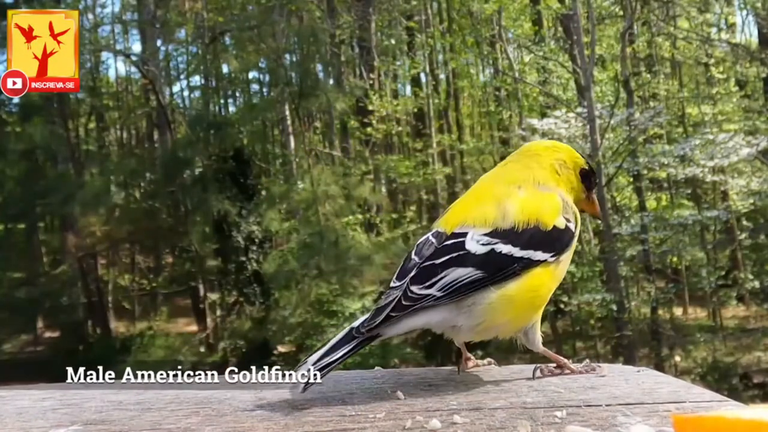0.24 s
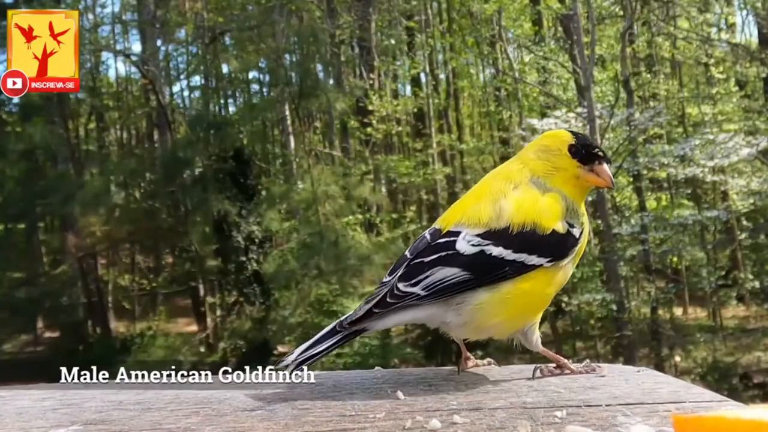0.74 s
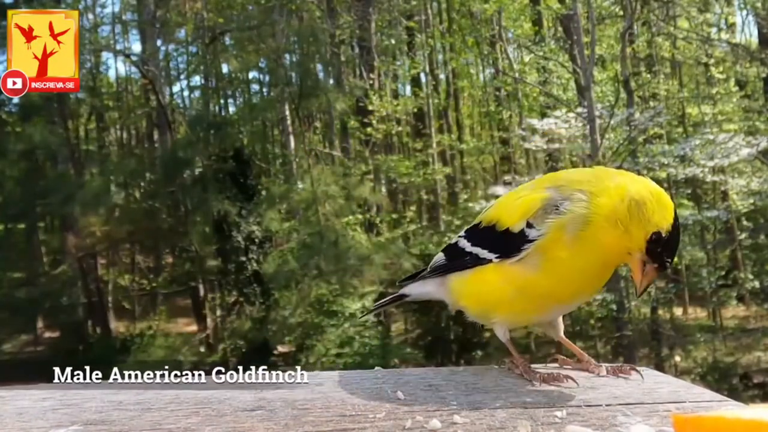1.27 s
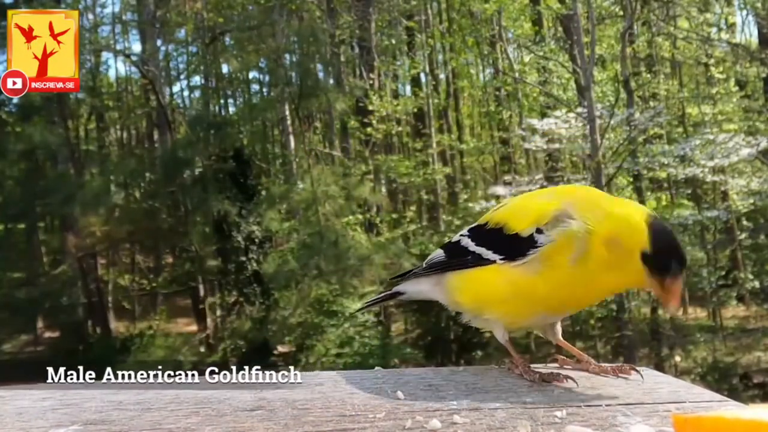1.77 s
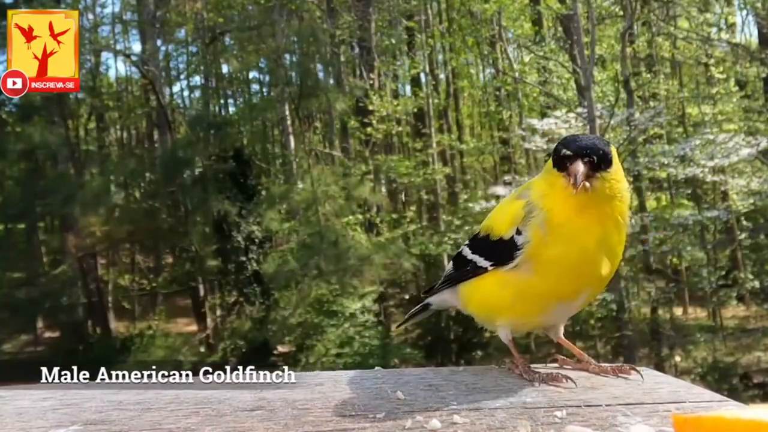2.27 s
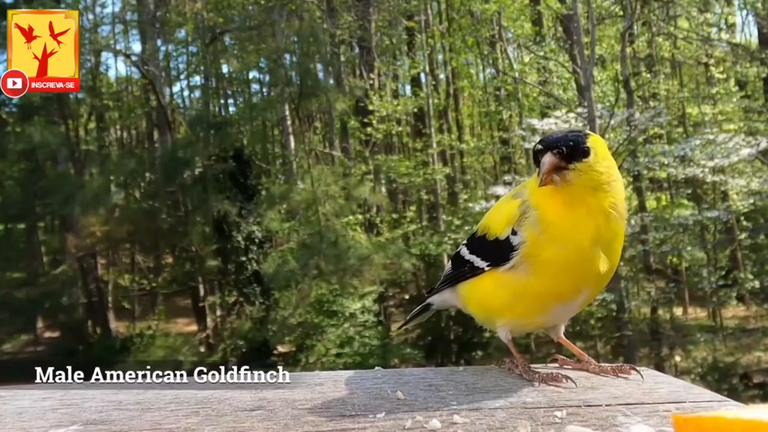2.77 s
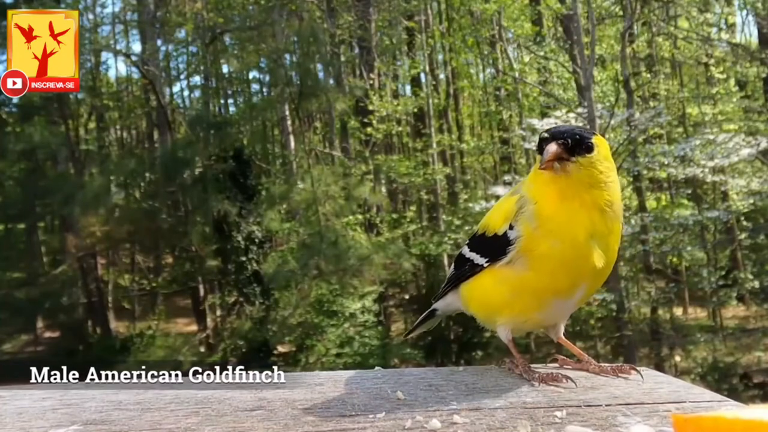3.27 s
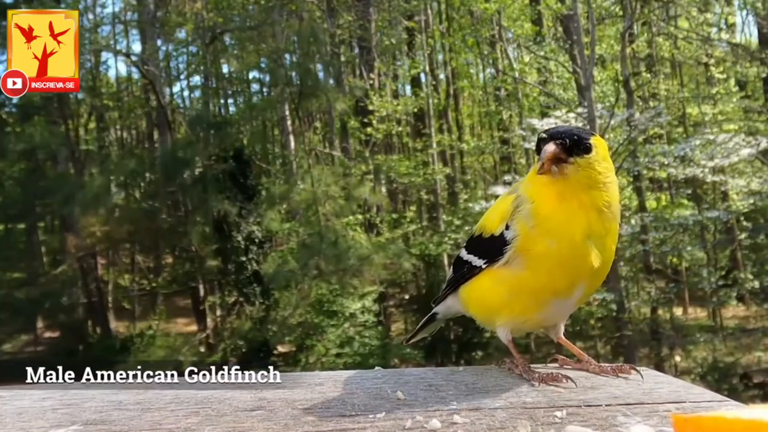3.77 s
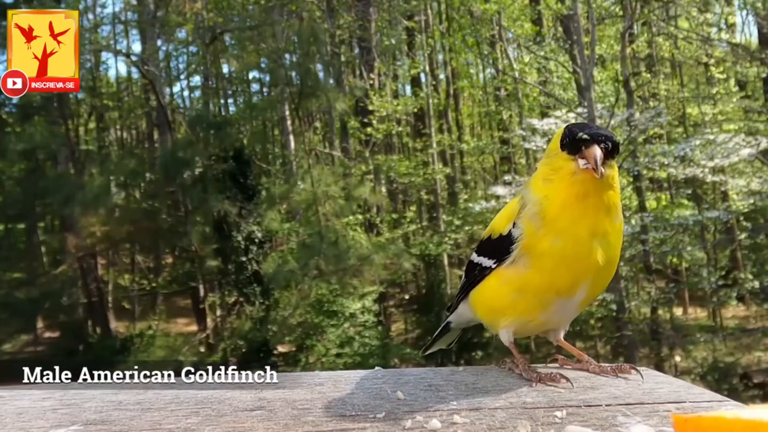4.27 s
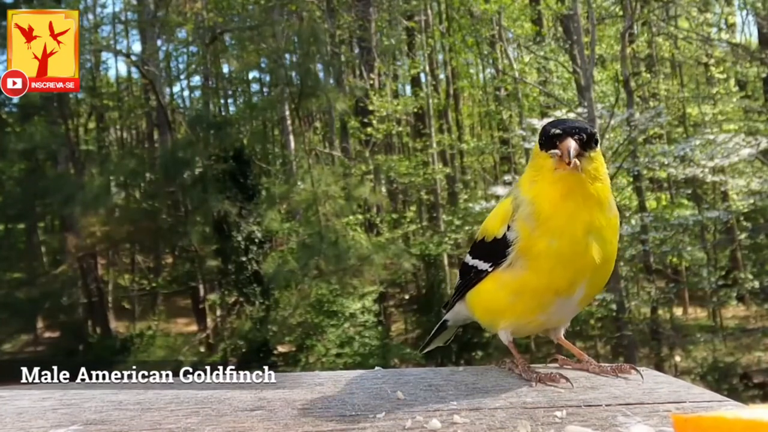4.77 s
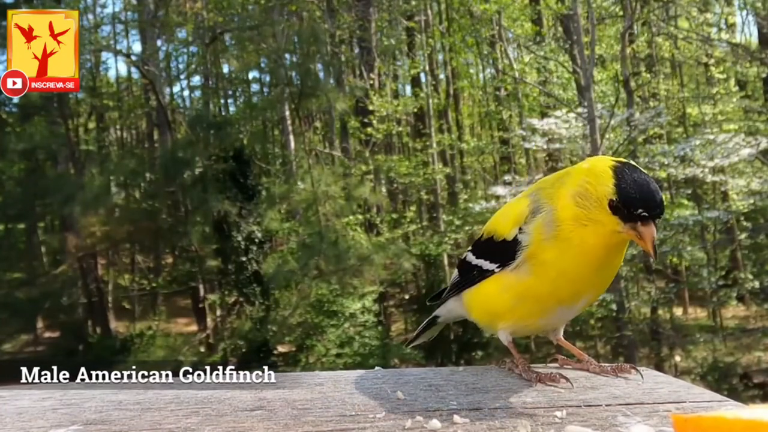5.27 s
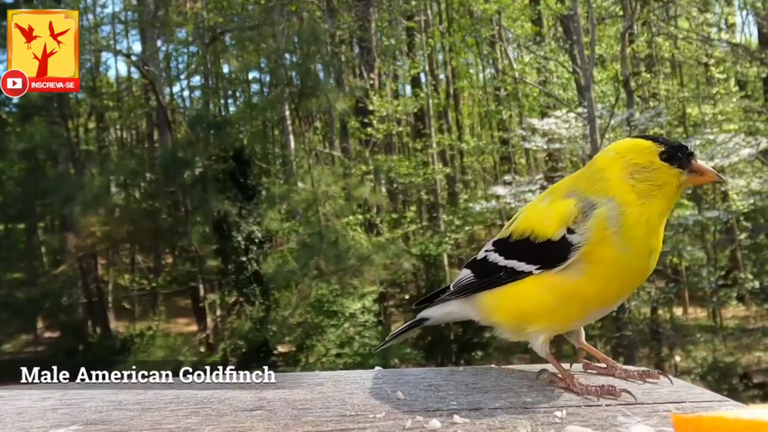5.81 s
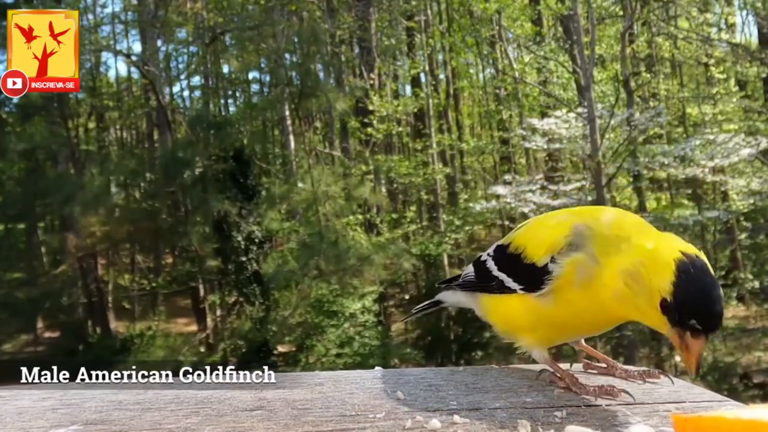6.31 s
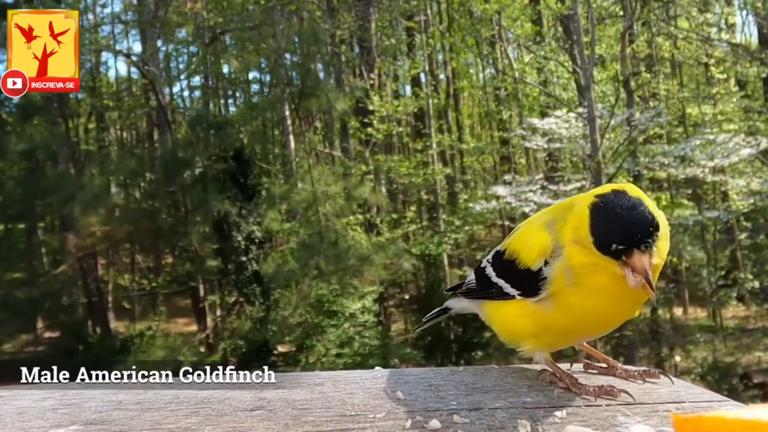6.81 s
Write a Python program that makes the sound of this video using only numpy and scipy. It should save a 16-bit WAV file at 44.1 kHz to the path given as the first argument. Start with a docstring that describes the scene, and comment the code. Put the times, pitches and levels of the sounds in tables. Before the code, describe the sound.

Backyard feeder in the woods: dry wooden ticks, thin bird whistles, a buzzing trill and brief wing thumps above far traffic rumble.

```python
"""Beaks and claws tick and knock on a wooden feeder throughout: noise bursts excite decaying board modes.
Small birds pip, whistle and warble as gliding tones that echo among trees; far traffic hisses as shaped noise.
A far engine's firing tone swells and fades, a car passes near 1 s, and the image opens from mono to stereo.
Buzzes and chips follow; near 3.7 s a buzz opens a trill, rapid frequency modulation of one whistle.
Wing beats puff air on the microphones near 4 s, a squeak falls, and ticks, whistles and buzzes go on."""
import sys
import numpy as np
from scipy import signal
from scipy.fft import rfft, irfft, next_fast_len
from scipy.io import wavfile
from scipy.ndimage import uniform_filter1d, map_coordinates

SR = 44100
rng = np.random.default_rng(int(sys.argv[2]) if len(sys.argv) > 2 else 0)


def volts_from_decibels(level):
    """Turn decibel levels (scalar or array-like) into linear amplitude factors."""
    exponent = np.asarray(level, float) / 20
    return 10 ** exponent


def to_wav(sig):
    """Store sig (one row per channel, or 1-D mono) as 16-bit WAV at the path in sys.argv[1].

    Samples outside -1..1 are clipped; the rate is SR.
    """
    pcm = np.clip(np.atleast_2d(sig), -1, 1) * 32767
    pcm = np.round(pcm).astype(np.int16)
    wavfile.write(sys.argv[1], SR, pcm.T)  # frames by channels


N = 310905
TIME = np.arange(N) / SR
SHAKE_RATE = 196  # shakes a second in the opening buzz and the trill


def unit(x):
    """Normalization: scales a signal to rms 1."""
    return x / np.sqrt(np.mean(x ** 2) + 1e-20)


def along(points, hz):
    """Interpolates (frequency [Hz], value) points on a logarithmic frequency axis."""
    f, v = np.transpose(points)
    return np.interp(np.log(hz + 1), np.log(f + 1), v)


def curves(rows, t=TIME):
    """Piecewise-linear control: one value per sample for each column after the first."""
    s, *columns = np.transpose(rows)
    return [np.interp(t, s, column) for column in columns]


def span(rows):
    """Windowing: first sample, times and a tapered envelope of a note."""
    first = round(rows[0][0] * SR)
    t = TIME[first:round(rows[-1][0] * SR)]
    return first, t, signal.windows.tukey(len(t), min(1, 400 / len(t)))


def wobble(rate, size=N):
    """Band-limited random modulation: a smooth curve through rate random knots a second."""
    knots = rng.standard_normal(int(size * rate / SR) + 4)
    return map_coordinates(knots, [np.arange(size) * rate / SR])


def filtered(x, response):
    """Linear filtering: the spectrum is multiplied by a response of frequency."""
    m = next_fast_len(x.shape[-1] + 8192)
    return irfft(rfft(x, m) * response(np.fft.rfftfreq(m, 1 / SR)), m)[..., :x.shape[-1]]


def add(out, first, x, pan_db):
    """Superposition: mixes a sound in, placed by a level difference of left over right."""
    x = x[:N - first]
    out[:, first:first + len(x)] += x * volts_from_decibels([[.5], [-.5]] * np.broadcast_to(pan_db, x.shape))


def sine(hz):
    """Phase is the integral of frequency: a tone of rms 1 that follows a pitch curve."""
    return np.sqrt(2) * np.sin(2 * np.pi * np.cumsum(hz) / SR)


def swell(length, edge_s):
    """Amplitude envelope: progress 0-1 of a note and its linear rise, hold and fall."""
    u = np.linspace(0, 1, round(length * SR))
    return u, np.clip(np.minimum(u, 1 - u) * length / edge_s, 0, 1)


def slur(length, start_hz, end_hz, bend, octave_db, late=1, hook_hz=0):
    """Frequency sweep with a second harmonic: a quick slide that grows louder and stops."""
    u = np.linspace(0, 1, round(length * SR))
    hz = end_hz + (start_hz - end_hz) * (1 - u) ** bend + hook_hz * u ** 4
    octave = volts_from_decibels(octave_db) / (u + .15) * sine(2 * hz)  # strongest against the tone at the soft start
    return u ** late * np.clip((1 - u) / 0.22, 0, 1) * (sine(hz) + octave)


def shaken(hz, swing_hz, rate, rough, pulse_db=0):
    """Frequency modulation: a whistle shaken fast; positive pulse_db makes its low pitches louder."""
    size = len(hz)
    phase = 2 * np.pi * np.cumsum(rate * (1 + .1 * rough * wobble(50, size=size))) / SR
    shake = np.sin(phase) + rough * wobble(300, size=size)
    level_db = 7.7 * rough * wobble(400, size=size) - pulse_db * shake
    return volts_from_decibels(level_db) * sine(hz + swing_hz * shake)


def birds():
    """Direct sound plus reflections: all the calls among echoing trees."""
    near, echo = np.zeros((2, 2, N))
    for call in (trill, opening_buzz, buzzes, chips, short_slurs, squeak, warbles, whistles, far_calls, pips):
        call(near, echo)
    wall = .3 * np.roll(echo, round(.025 * SR), axis=1)  # one reflection
    return near + wall + woods(echo, delay_s=.012)


def trill(near, echo):
    """Periodic frequency modulation: one pitch pattern repeats at a slowing rate and dies away."""
    start_s, end_s = 3.8565, 4.285
    rate, slows = 40.8, 18  # syllables a second, and their loss a second
    # pitch pattern of one syllable: (share of its length [0-1], frequency [Hz], relative level [dB])
    syllable = [(0, 3581, -5.5), (.1, 3423, 5.5), (.21, 3225, -4.5), (.33, 3504, -15.5), (.45, 3812, 3),
                (.6, 4060, 5.5), (.78, 4400, -5), (.9, 4082, -4)]
    u, edge = swell(end_s - start_s, 0.0089)
    t = u * (end_s - start_s)
    closed = [*syllable, (1, *syllable[0][1:])]  # each ends where the next begins
    hz, accent_db = curves(closed, np.cumsum(rate - slows * t) / SR % 1)
    shake = np.sin(2 * np.pi * SHAKE_RATE * t)  # the buzz lingers in every syllable
    hz = hz + 60 * shake
    accent_db = accent_db + 0.9 * shake - 4 * np.exp(-t / .03)
    accent_db = accent_db - 74 * np.clip(t - 0.28, 0, None)  # tires after 0.28 s
    accent_db = accent_db - 12.5 * t * np.clip((3750 - hz) / 300, 0, 1)  # low strokes fade faster
    level_db = -37.5 - 9.5 * t + accent_db + 1.5 * wobble(120, size=len(t))
    song = edge * volts_from_decibels(level_db) * sine(hz)
    add(near, round(start_s * SR), song, 4)
    add(echo, round(start_s * SR), volts_from_decibels(-4.0) * song, 2.5)


def opening_buzz(near, echo):
    """Frequency modulation of growing width: the buzz before the trill widens, then falls in pulses."""
    # path of the buzz: (time [s], centre frequency [Hz], level [dB], swing [Hz], pulse depth [dB])
    opening = [(3.69, 5560, -71, 10, 0.5), (3.728, 5560, -43.5, 46, -2), (3.745, 5530, -42.5, 400, 2),
               (3.77, 5610, -43, 530, 3), (3.79, 5350, -43, 740, 5), (3.815, 4770, -42, 560, 6.5),
               (3.84, 4200, -39, 250, 4.5), (3.848, 3754, -39, 40, 0), (3.858, 3350, -35.5, 20, 1.5),
               (3.866, 3140, -41.5, 20, -1)]
    first, t, edge = span(opening)
    hz, db, swing_hz, pulse_db = curves(opening, t)
    buzz = edge * volts_from_decibels(db) * shaken(hz, swing_hz, SHAKE_RATE, .08, pulse_db)
    add(near, first, buzz, 3.5)
    add(echo, first, volts_from_decibels(-3.0) * buzz, 2.5)


def buzzes(near, echo):
    """Frequency modulation about a steady centre: shakes too fast to follow are heard as a buzz."""
    # (time [s], length [s], centre frequency [Hz], level [dB], shakes a second [Hz], roughness [0-1], swing [Hz])
    steady_buzzes = [(3.397, 0.19, 2655, -50.5, 103, 0.09, 340), (2.7, 0.13, 4180, -69.5, 90, .4, 365),
                     (2.93, 0.18, 2600, -70, 120, .4, 365), (3.1, 0.16, 3900, -67, 130, 0.3, 365),
                     (3.425, 0.046, 3560, -53, 118, .25, 280), (3.5, .12, 3850, -70, 103, .3, 330),
                     (6.53, 0.11, 5980, -75, 190, 0.42, 365), (6.854, 0.14, 5890, -73, 180, 0.42, 365)]
    for s, length, hz, db, rate, rough, swing_hz in steady_buzzes:
        u, edge = swell(length, edge_s=0.015)
        buzz = edge * volts_from_decibels(db) * shaken(hz + 0 * u, swing_hz, rate, rough)
        add(near, round(s * SR), buzz, 3.5)
        add(echo, round(s * SR), volts_from_decibels(-2.5) * buzz, 2.5)


def chips(near, echo):
    """Downward frequency sweep: one bird's chips slur from a shared top pitch and hook up at the end."""
    top_hz, length_s, bend, octave_db = 9160, 0.026, 3.25, -48
    echo_db = -69.5  # the same for all
    # (time [s], end frequency without hook [Hz], hook rise [Hz], level [dB], left over right [dB])
    chip_rows = [(2.786, 7570, 480, -62.5, 22), (3.594, 7920, 150, -54, 17), (5.069, 7540, 200, -40.5, 26)]
    for s, end_hz, hook_hz, db, pan_db in chip_rows:
        chip = slur(length_s, top_hz, end_hz, bend, octave_db, 0.94, hook_hz)
        add(near, round(s * SR), volts_from_decibels(db) * chip, pan_db)
        reply = slur(length_s, top_hz, end_hz, bend, octave_db, late=0.4)
        add(echo, round(s * SR), volts_from_decibels(echo_db) * reply, 0.27 * pan_db)


def short_slurs(near, echo):
    """Frequency sweep: short slides of other birds, with a weak second harmonic."""
    # (time [s], start frequency [Hz], end frequency [Hz], level [dB], octave gain [dB], left over right [dB])
    slur_rows = [(1.555, 8000, 7020, -73, -40, -9), (4.576, 2640, 3880, -51, -25.5, 26)]
    for s, start_hz, end_hz, db, octave_db, pan_db in slur_rows:
        call = slur(.05, start_hz, end_hz, 0.91, octave_db, late=1.0)
        add(near, round(s * SR), volts_from_decibels(db) * call, pan_db)
        add(echo, round(s * SR), volts_from_decibels(min(db, -61.5)) * call, 0.3 * pan_db)


def squeak(near, echo):
    """Harmonic series: partials glide down in parallel as a harsh squeak close by, without echo."""
    start_s, length_s, start_hz, end_hz = 4.139, .035, 1196, 872
    # partials of the squeak: (harmonic number, level [dB], lateness of its swell [exponent])
    partials = [(3, -45, .1), (4, -27.5, 1.1), (6, -51.5, 0.36), (7, -66, .6), (8, -62.5, 0.48)]
    for k, db, late in partials:
        partial = slur(length_s, k * start_hz, k * end_hz, 1.3, -120, late)
        add(near, round(start_s * SR), volts_from_decibels(db) * partial, 9)


def warbles(near, echo):
    """Continuous frequency modulation: one bird's phrases waver along a pitch curve."""
    # phrases, each a list of (time [s], frequency [Hz], level [dB])
    phrases = [
        [(.265, 4220, -75), (.336, 4300, -69), (.378, 4350, -65), (.39, 4230, -76), (.416, 4270, -65),
         (.486, 4206, -65), (.508, 4430, -68), (.52, 4270, -73), (.55, 4180, -75.5), (.59, 4400, -60.5),
         (.65, 4180, -62), (.674, 4290, -63), (.685, 4150, -64.5), (.7, 4220, -65), (.725, 4260, -79),
         (.82, 4200, -83)],
        [(.878, 4660, -86), (.915, 4520, -73), (.955, 4560, -65), (.998, 4420, -60.5), (1.04, 4350, -60.5),
         (1.076, 4320, -58.5), (1.09, 4420, -58), (1.108, 4640, -61), (1.13, 4600, -67), (1.155, 4690, -63.5),
         (1.168, 4680, -74)],
    ]
    for rows in phrases:
        first, t, edge = span(rows)
        hz, db = curves(rows, t)
        level_db = db + 2.6 * wobble(55.6, size=len(t))
        phrase = edge * volts_from_decibels(level_db) * sine(hz + 22 * wobble(70, size=len(t)))
        add(near, first, phrase, 3)
        add(echo, first, volts_from_decibels(-11.5) * phrase, 1.5)


def whistles(near, echo):
    """Pure tones, level or gliding; the faint come from far off, smeared and with more echo."""
    # level whistles: (time [s], length [s], frequency [Hz], level [dB])
    notes = [(3.35, .08, 6780, -91), (2.435, 0.029, 5701, -80), (2.47, 0.17, 4880, -68),
             (2.633, 0.14, 4916, -71), (2.815, 0.05, 4969, -65), (2.93, .035, 4920, -76),
             (3.362, .04, 2750, -64.5), (3.58, 0.11, 2765, -62), (6, .045, 3160, -68),
             (5.65, .035, 3160, -70.5), (5.715, .08, 3160, -72.5), (5.87, .11, 3150, -81),
             (5.525, .035, 3900, -73), (5.46, 0.12, 2400, -73.5), (6.24, 0.19, 3000, -73),
             (6.18, .035, 3460, -70), (6.22, .13, 3450, -79.5), (6.165, .04, 3020, -70),
             (6.55, .05, 3450, -74), (6.72, 0.12, 3560, -75)]
    # gliding whistles: (time [s], length [s], start frequency [Hz], end frequency [Hz],
    # haste [under 0 quick at first, over 0 quick at last], level [dB])
    glides = [(.365, 0.1, 6500, 6740, 1.5, -83), (.61, 0.08, 7230, 7750, 2.2, -83),
              (2.05, 0.31, 6150, 8950, 4.5, -84), (3.32, .04, 2500, 2640, -1.5, -65)]
    level_notes = [(s, length, hz, hz, 1, db) for s, length, hz, db in notes]
    for s, length, start_hz, end_hz, haste, db in [*level_notes, *glides]:
        u, edge = swell(length, edge_s=.012)
        faint_db = max(0, -70 - db)
        hz = start_hz + (end_hz - start_hz) * np.expm1(haste * u) / np.expm1(haste)
        hz = hz + 14 * wobble(45, size=len(u))
        hz = hz + 1.5 * faint_db * wobble(250, size=len(u))
        dull_db = (hz - min(start_hz, end_hz)) / 1000  # 1 dB per kHz: the high end of a glide carries less
        flutter_db = 2.2 + (.1 if start_hz != end_hz else .35) * faint_db
        note = edge * volts_from_decibels(db - dull_db + flutter_db * wobble(60, size=len(u))) * sine(hz)
        add(near, round(s * SR), note, 3)
        add(echo, round(s * SR), volts_from_decibels(-13 + .55 * faint_db) * note, 1.5)


def far_calls(near, echo):
    """Random amplitude and frequency modulation: far calls arrive broken, with strong echo."""
    # calls, each a list of (time [s], frequency [Hz], level [dB])
    call_paths = [
        [(.858, 7600, -92), (.876, 6700, -82), (.92, 5950, -80), (.96, 5520, -77), (1.0, 5220, -74),
         (1.06, 4880, -76), (1.09, 4780, -74), (1.19, 4790, -77)],
        [(1.685, 1642, -67), (1.73, 1726, -66), (1.81, 1776, -67), (1.86, 1905, -66), (1.92, 1960, -70),
         (1.99, 1910, -71.5), (2.03, 1950, -71)],
        [(2.5, 1560, -72), (2.57, 1654, -60.5), (2.6, 1740, -61), (2.64, 1790, -76), (2.69, 1860, -74),
         (2.72, 1900, -62), (2.79, 1965, -67), (2.82, 1900, -70), (2.87, 1920, -68)],
        [(2.972, 5550, -80.5), (2.995, 5920, -72), (3.025, 6020, -80), (3.04, 6030, -74), (3.06, 5900, -81)],
    ]
    for rows in call_paths:
        first, t, edge = span(rows)
        hz, db = curves(rows, t)
        level_db = db + 2.8 * wobble(45, size=len(t))
        wavering_hz = hz * (1 + .0000025 * hz * wobble(120, size=len(t)))  # waver grows as pitch squared
        call = edge * volts_from_decibels(level_db) * sine(wavering_hz)
        add(near, first, call, 2)
        add(echo, first, volts_from_decibels(-1) * call, 1)


def pips(near, echo):
    """Windowed pure tones: a far bird's even pips, without echo."""
    # (time [s], length [s], level [dB])
    pip_rows = [(0.125, 0.091, -75.5), (0.22, .03, -78), (0.295, 0.055, -77), (.365, .03, -83),
                (.43, .055, -76), (.545, .035, -76), (0.59, 0.095, -81), (.7, 0.03, -81), (.76, .085, -79),
                (0.885, 0.06, -80)]
    for s, length, db in pip_rows:
        size = round(length * SR)
        envelope = volts_from_decibels(db + 1.4 * wobble(60, size=size)) * signal.windows.tukey(size, .6)
        add(near, round(s * SR), envelope * sine(5080 + 16 * wobble(60, size=size)), 0)


def woods(x, delay_s):
    """Reverberation: trunks scatter the song, partly alike on both sides; each band has its own decay."""
    # decay of the woods: (frequency [Hz], time to fall 60 dB [s])
    decay = [(1500, 0.2), (2700, 0.53), (3300, 0.66), (3900, 1), (4250, 0.72), (4700, 0.6), (6000, 0.55),
             (8000, 0.42)]
    noise = np.array([[1, .5], [1, -.5]]) @ rng.standard_normal((2, SR))
    hz, t, z = signal.stft(noise, SR, nperseg=256)
    tail = signal.istft(z * volts_from_decibels(-60 * t / along(decay, hz)[:, None]), SR, nperseg=256)[1]
    tail = np.pad(tail, ((0, 0), (round(delay_s * SR), 0))) / np.linalg.norm(tail[0])
    return signal.fftconvolve(x, tail, axes=1)[:, :N]


def feeder():
    """Impact and modal resonance: ticks are short scratches of noise, with knocks of damped board modes."""
    # ticks on the board: (time of scratch peak [s], level [dB], left over right [dB],
    # knock gain before a common 2 dB lift [dB], brightness [dB per octave])
    ticks = [(0.026, -63.5, 3.5, 16, 2), (0.258, -56, 0, 5, -2), (0.397, -71.5, 0, 8, 1),
             (1.031, -49.5, -9, 14.5, 1), (1.8773, -68, -18, 9, 0), (2.218, -64, -12, 3, 4),
             (2.586, -59.5, 2, 19.5, -3.5), (2.798, -56.5, 3, -13, 2.5), (3.04, -63, -11, 12, 3),
             (3.052, -53, 5.5, 7, 2), (3.1135, -49.5, 7.5, -7, 0), (3.1245, -47, 9, 6, 0.5),
             (3.144, -59.5, 6, 14, 3), (3.248, -61, 12, -1, -0.5), (3.28, -67, 4, 0, 0),
             (3.432, -51, -3, 16, -1), (3.454, -54, -7, 25.5, -0.5), (3.461, -50.5, -6, 16, 0.5),
             (3.5178, -59, 4, -7, 1.5), (3.599, -57, 6, 15.5, -4), (3.862, -52, 1, -15, 1.5),
             (4.01, -55, 2.25, -5, 3), (4.025, -51, 11, 9, 2), (4.067, -55.5, 16, -6, 2.5),
             (4.108, -56, -5.5, -12, 1), (4.783, -65, 3, -9, 2), (4.946, -71, 2, -6, 1),
             (5.076, -61.5, 5, 3, 2.5), (5.11, -60, 5, 3, -2), (5.347, -66, 3, 6, -1),
             (5.717, -53, 4, 10.5, 0.5), (5.7366, -57.5, 5, 16.5, 2), (6.644, -70, -3, 4, 5.5),
             (6.768, -58, -2, -7, 4), (6.88, -70, 2, 5, 3)]
    # scratch spectrum: (frequency [Hz], gain [dB])
    snap = [(200, -120), (400, -1), (1500, 4), (2500, -7.5), (3600, 2), (4500, -7), (5600, -9), (7000, -17),
            (8200, -18), (9500, -32.5), (12500, -36.5), (15000, -120)]
    # board modes: (frequency [Hz], mean level [dB], time to fall 60 dB [s])
    board = [(400, -8, .022), (520, -7, .03), (813, 0, .034), (985, -6, .035), (1430, -12, .03)]
    out, t = np.zeros((2, N)), TIME[:4096]
    u = t / 0.0044
    contact = 1 - np.exp(-t / .0025)  # soft contact
    for s, db, pan_db, knock_db, tilt_db in ticks:
        noise = filtered(rng.standard_normal(len(t)),
                         lambda hz: volts_from_decibels(along(snap, hz) + tilt_db * np.log2((hz + 1) / 3000)))
        scratch = unit(noise) * u * np.exp(1 - u) ** 1.4
        knock = sum(volts_from_decibels(level + rng.normal(0, 3.9) - 60 * t / t60) * np.sin(2 * np.pi * hz * t)
                    for hz, level, t60 in board)
        tick = scratch + volts_from_decibels(knock_db + 2.0) * knock * contact
        add(out, round((s - .003) * SR), volts_from_decibels(db) * tick, pan_db)
    return out


def puff(s, hz, cycles):
    """Pressure pulse: a push of air and its rebound under a Gaussian envelope."""
    u = (TIME - s) * hz
    return -np.sin(2 * np.pi * u) * np.exp(-(2 * u / cycles) ** 2)


def wings():
    """Unsteady airflow: three evenly spaced wing beats, then wake thumps and swirls over the microphones."""
    beat_s, gap_s, beat_db, loss_db = 4.032, .041, -16.5, 2  # first, period, level, loss a beat
    down_hz, up_hz, up_db, up_after_s = 62, 199, -12, .025  # downstroke push, upstroke flick
    lee_db, lee_cycles = -17, 0.49  # thumps: the right microphone is sheltered and reached later
    swirl_s, swirl_lag_s = 0.0047, 0.00084  # rise of a swirl, delay on the right
    # wake over the microphones: (time [s], thump frequency [Hz], thump level [dB], swirl level [dB])
    wakes = [(4.166, 98, -7, -24.5), (4.194, 67, -10, -21.5), (4.221, 110, -14.5, -31.5),
             (4.252, 52, -16, -51)]
    # swirl spectrum: (frequency [Hz], gain [dB])
    swirl_spectrum = [(90, -120), (150, -6), (230, 4.5), (340, -4.5), (550, -15), (800, -30), (1300, -120)]
    out = np.zeros((2, N))
    for k in range(3):
        s = beat_s + k * gap_s
        beat = puff(s, down_hz, cycles=0.72) + volts_from_decibels(up_db) * puff(s + up_after_s, up_hz, cycles=0.91)
        out += volts_from_decibels(beat_db - k * loss_db) * beat * volts_from_decibels([[0], [-2.1]])
    noise = filtered(rng.standard_normal((2, N)), lambda hz: volts_from_decibels(along(swirl_spectrum, hz)))
    late_side = np.roll(noise[0], round(swirl_lag_s * SR)) + 0.26 * noise[1]
    swirl = unit(np.array([noise[0], late_side]))
    for s, hz, thump_db, swirl_db in wakes:
        sheltered = volts_from_decibels(lee_db) * puff(s + lee_cycles / hz, hz, cycles=1.0)
        out += volts_from_decibels(thump_db) * np.array([puff(s, hz, cycles=1.18), sheltered])
        u = np.clip((TIME - s - .002) / swirl_s, 0, None)
        gust = u * np.exp(1 - u)  # strikes fast, dies slower
        burst = gust * swirl
        out += volts_from_decibels(swirl_db) * burst * np.linalg.norm(gust) / np.linalg.norm(burst, axis=1, keepdims=True)
    return out


def engine():
    """Periodic firing: a far engine's slowly sagging tone and weak octave, a little late on the right."""
    # firing tone: (time [s], mean level [dB])
    drone = [(0, -57), (1.3, -50), (1.5, -48), (2.3, -51.5), (2.45, -40.5), (2.92, -49.5), (3.06, -36),
             (3.3, -40), (3.68, -32), (3.9, -38.5), (4.3, -35), (4.5, -29), (4.78, -29), (5.16, -34.5),
             (5.25, -40), (5.3, -33), (5.5, -26), (5.86, -39), (5.95, -61), (6.06, -38), (6.16, -29),
             (6.45, -35), (7.05, -31)]
    hz = 89.23 - .9 * TIME + 0.81 * wobble(4)
    db, = curves(drone)
    firing = volts_from_decibels(db + 1.2 * wobble(9)) * sine(hz)
    octave = volts_from_decibels(-62.5 + 4.9 * wobble(8.8)) * sine(2 * hz)
    tone = firing + octave
    return np.array([tone, np.roll(tone, 11)]) * volts_from_decibels([[.7], [-.7]])  # 11 samples late


def rush(spectrum, patchy_db):
    """Diffuse field: partly coherent stereo noise with patches of random gain, its mono mean of rms 1."""
    # diffuseness: (frequency [Hz], side over mid [dB])
    spread = [(60, -23), (110, -16.5), (180, -27.5), (320, -18.5), (560, -13), (990, -12.5), (1730, -1.5),
              (3030, 0.5), (5320, -2.5), (9310, 2.5)]
    # balance: (frequency [Hz], left over right [dB])
    lean = [(60, 1.5), (110, 0.5), (180, -1), (320, 1), (560, 1), (990, 1.5), (1730, 3.5), (3030, 9),
            (5320, 0.5), (9310, 4.5)]
    z = signal.stft(rng.standard_normal((2, N)), nperseg=512)[2]
    field = uniform_filter1d(rng.standard_normal(z.shape[1:]), 5, 0)
    field = uniform_filter1d(field, 12, 1)
    pair = signal.istft(z * volts_from_decibels(patchy_db * unit(field)), nperseg=512)[1][:, :N]
    mid, side = filtered(pair, lambda hz: volts_from_decibels(along(spectrum, hz) + [0 * hz, along(spread, hz)]))
    both = filtered(np.array([mid + side, mid - side]), lambda hz: volts_from_decibels(along(lean, hz) * [[.5], [-.5]]))
    return both / np.std(both.mean(0))


def wind():
    """Turbulent pressure: low noise, mostly alike on both microphones, with a fluctuating level."""
    # wind spectrum: (frequency [Hz], gain [dB])
    gust_spectrum = [(15, -120), (22, -12), (40, -2), (70, -1), (110, -11), (200, -24.5), (400, -120)]
    # wind: (time [s], mean level before a 6.5 dB lift [dB])
    wind_path = [(0, -57), (1.73, -54), (2.5, -57.5), (3.2, -52), (4.3, -47), (4.84, -57), (5.38, -52),
                 (6.04, -58), (6.34, -44), (6.75, -60.5), (7.05, -54)]
    db, = curves(wind_path)
    puffs = filtered(rng.standard_normal((2, N)), lambda hz: volts_from_decibels(along(gust_spectrum, hz)))
    pair = puffs[0] + 0.15 * puffs[1] * [[1], [-1]]
    return unit(pair) * volts_from_decibels(db + 6.5 + 1.7 * wobble(5.44))


def traffic():
    """Spherical spreading: a passing car's amplitude goes as 1/distance, over far roar and tyre hiss."""
    # spectra of far roar, tyre hiss and cars: (frequency [Hz], gain [dB])
    roar = [(60, -46.5), (100, -0.5), (140, 2.5), (250, -6), (340, -9.5), (450, -24.5), (600, -120)]
    tyres = [(410, -12), (700, -3), (1030, 0), (1120, -1), (1350, 0.5), (1880, -8.5), (2300, -28),
             (2990, -46), (5060, -120)]
    car = [(200, -120), (300, -6.5), (420, 2), (560, -1), (750, -5), (1000, -50.5), (1400, -120)]
    # far traffic: (time [s], level before the gains of roar and tyres [dB])
    traffic_path = [(0, -58), (.96, -55), (2.42, -57.5), (2.78, -52), (3.3, -54.5), (4.35, -56),
                    (4.84, -57.5), (5.38, -54), (6.04, -56.5), (6.7, -54), (7.05, -55.5)]
    nearest_s, pass_s = 0.96, 0.11  # pass_s: least distance over speed
    db, = curves(traffic_path)
    passing = volts_from_decibels(-54.5) / np.hypot(1, (TIME - nearest_s) / pass_s)
    others = volts_from_decibels(-59.5 - 0.4 * TIME)
    cars = (passing + others) * rush(car, patchy_db=3.0)
    far = volts_from_decibels(db + 2.5) * rush(roar, patchy_db=2.0)
    return far + cars + volts_from_decibels(db - 1.0) * rush(tyres, patchy_db=1.37)


def treble_wash():
    """Diffuse noise: a soft, patchy treble wash that swells near 3.8 s."""
    # treble wash spectrum: (frequency [Hz], gain [dB])
    wash_spectrum = [(1120, -32.5), (1900, -6.5), (2330, -3), (3130, -9), (4010, -7.5), (4440, -15.5),
                     (5760, -16.5), (6430, -21.5), (7730, -29.5), (9760, -46.5), (12700, -65),
                     (21500, -120)]
    # treble wash: (time [s], level before a 1.5 dB lift [dB])
    wash_path = [(0, -69.5), (2.42, -71.5), (3.2, -65.5), (3.8, -60.5), (4.5, -66.5), (5.38, -65), (6.04, -68),
                 (6.34, -67), (6.7, -66.5), (7.05, -69)]
    db, = curves(wash_path)
    return volts_from_decibels(db + 1.5) * rush(wash_spectrum, patchy_db=2.0)


def scene():
    """Superposition: the pressures of all sources add."""
    return birds() + feeder() + wings() + engine() + wind() + traffic() + treble_wash()


def top_cut(x):
    """Nothing passes above the cut-off."""
    return signal.sosfilt(signal.butter(12, 12380, fs=SR, output="sos"), x)


def record(dry):
    """Mid-side stereo: the side signal fades in and opens the image."""
    # opening of the image: (time [s], side gain [0-1])
    width = [(1.45, 0), (3.4, 1)]
    mid = (dry[0] + dry[1]) / 2
    side = (dry[0] - dry[1]) / 2 * curves(width)[0]
    return top_cut(np.array([mid + side, mid - side]))


dry = scene()
out = record(dry)
to_wav(out)
```